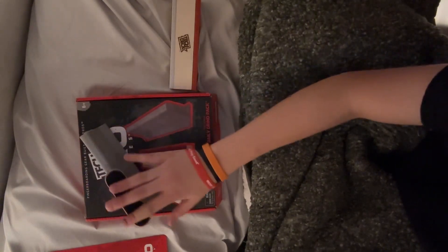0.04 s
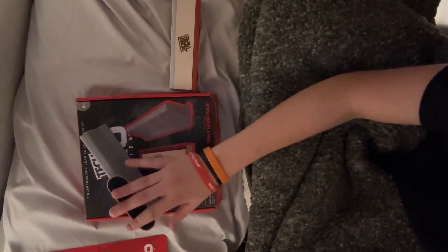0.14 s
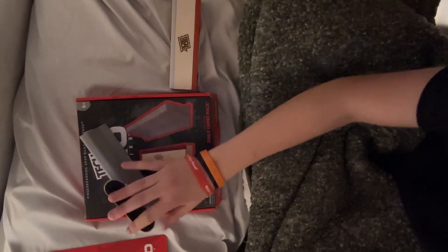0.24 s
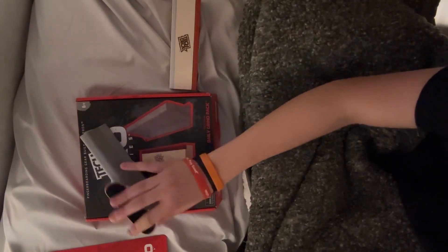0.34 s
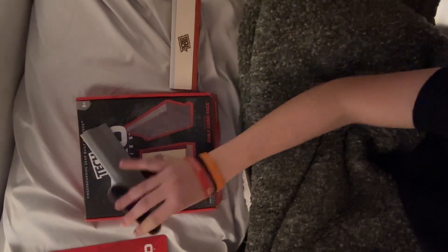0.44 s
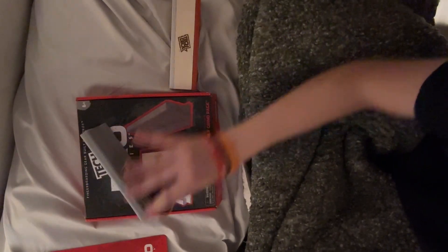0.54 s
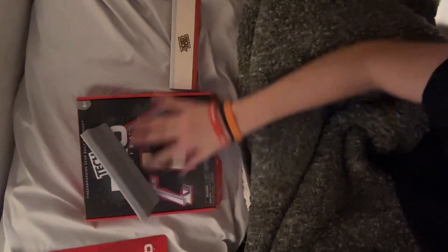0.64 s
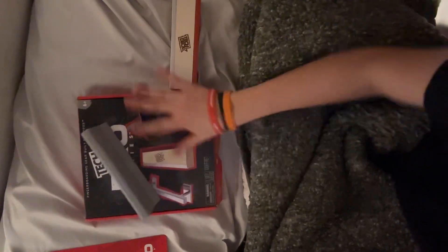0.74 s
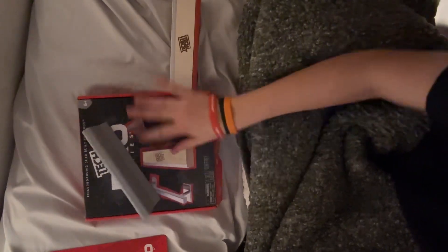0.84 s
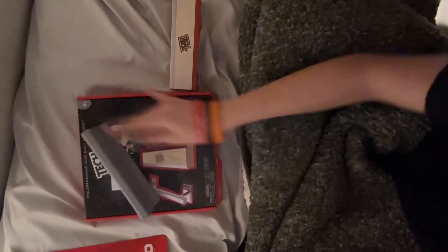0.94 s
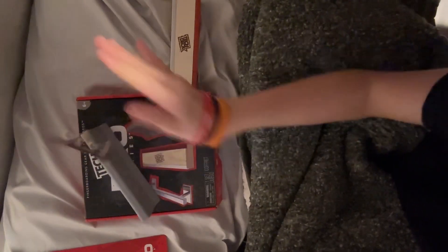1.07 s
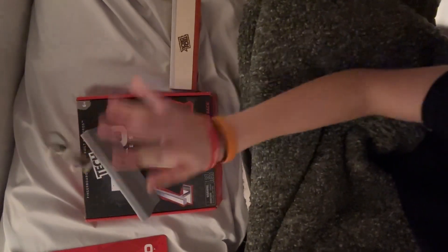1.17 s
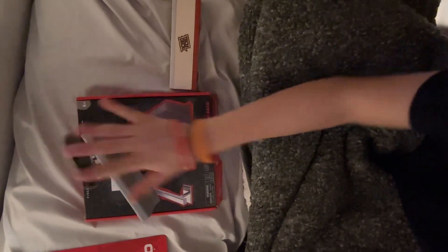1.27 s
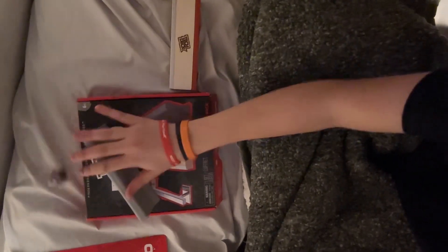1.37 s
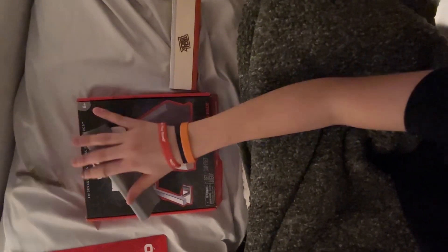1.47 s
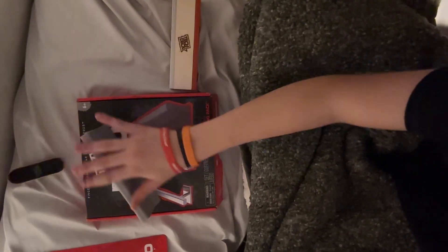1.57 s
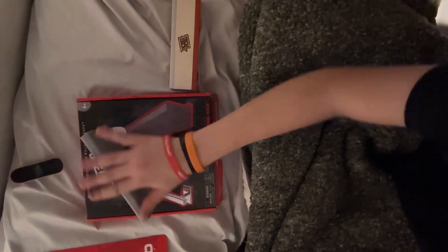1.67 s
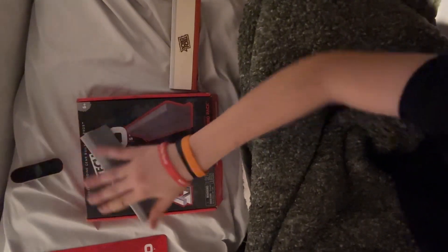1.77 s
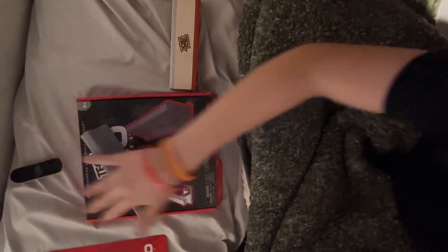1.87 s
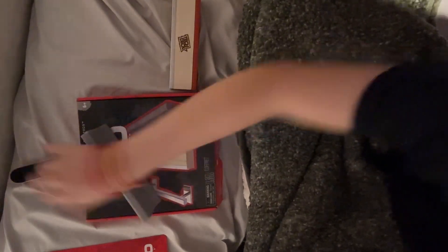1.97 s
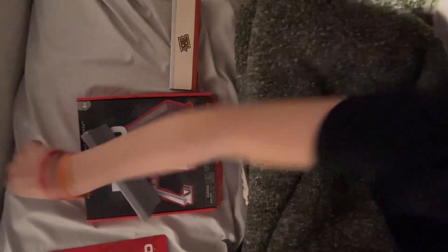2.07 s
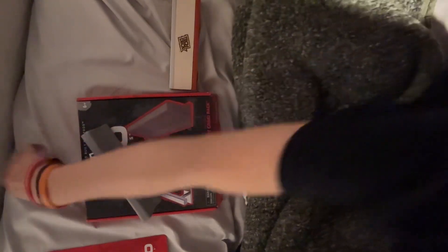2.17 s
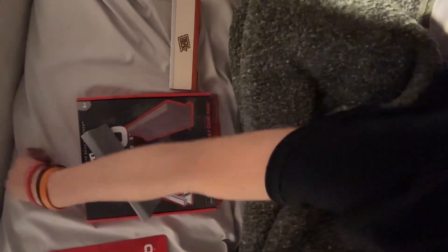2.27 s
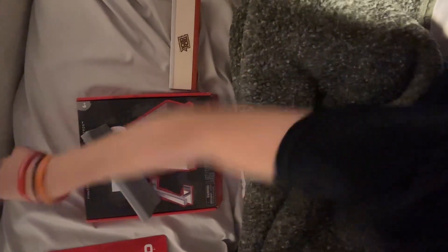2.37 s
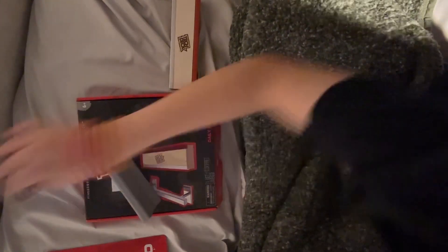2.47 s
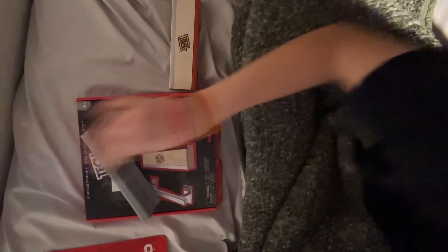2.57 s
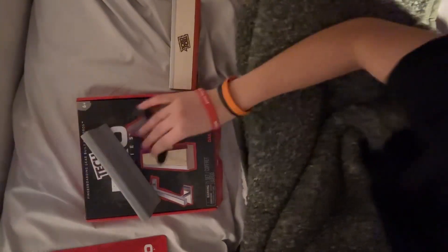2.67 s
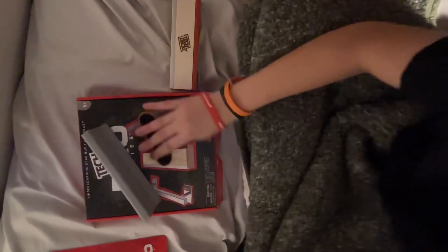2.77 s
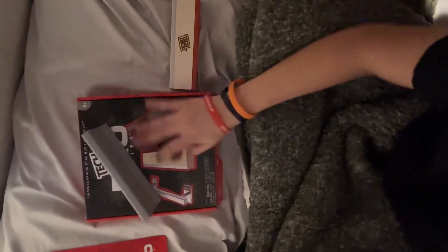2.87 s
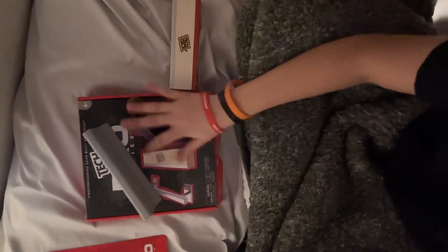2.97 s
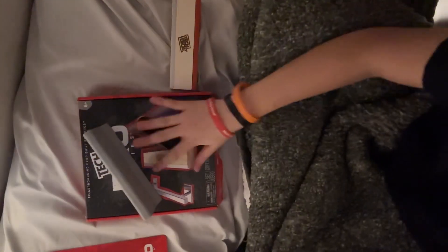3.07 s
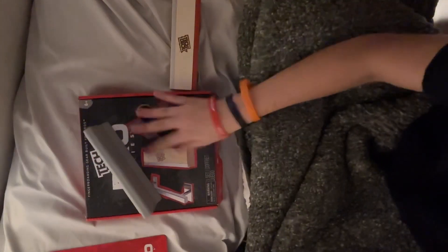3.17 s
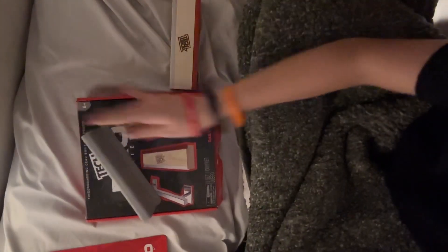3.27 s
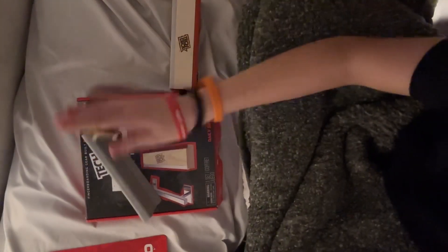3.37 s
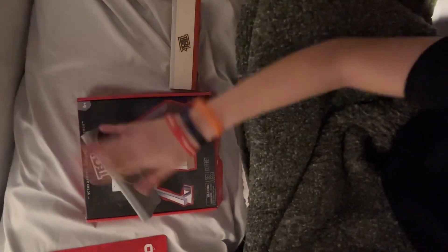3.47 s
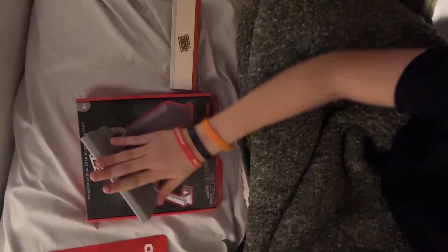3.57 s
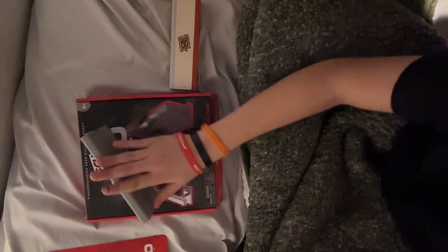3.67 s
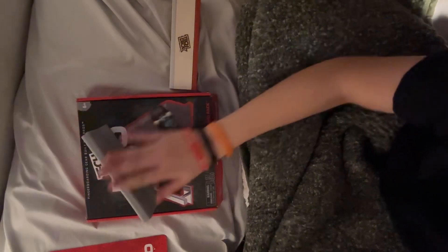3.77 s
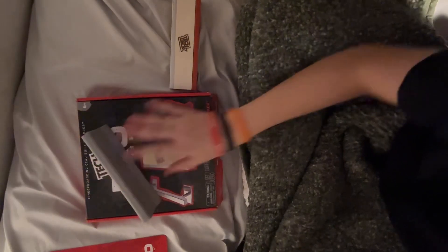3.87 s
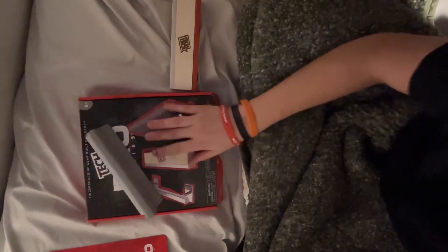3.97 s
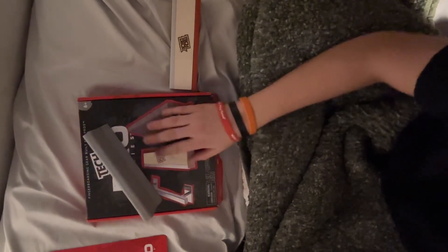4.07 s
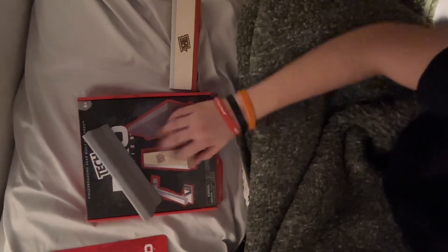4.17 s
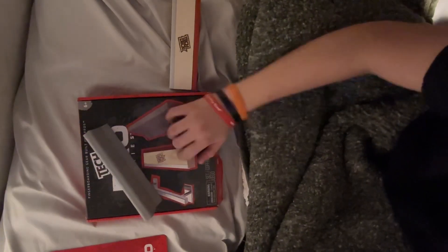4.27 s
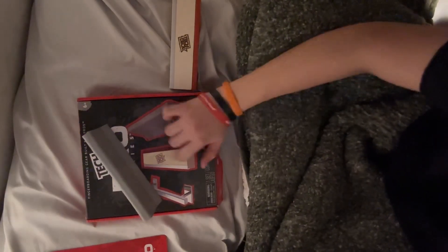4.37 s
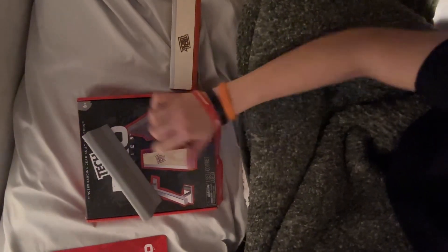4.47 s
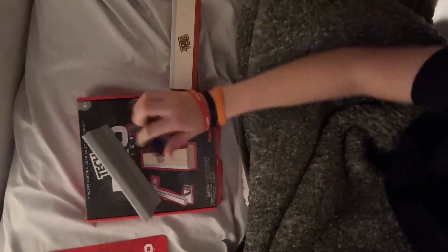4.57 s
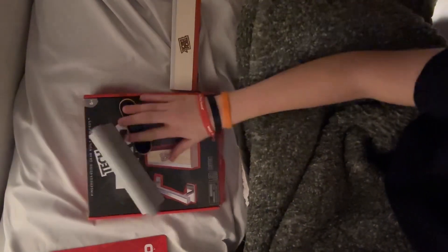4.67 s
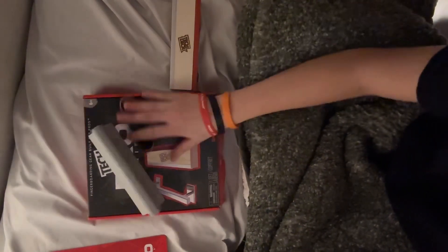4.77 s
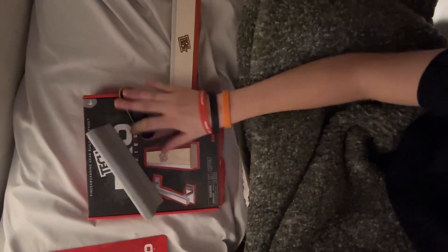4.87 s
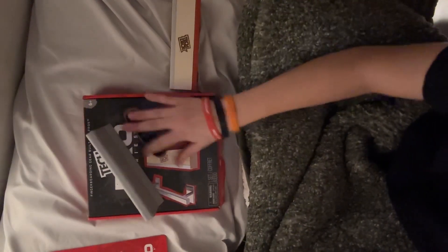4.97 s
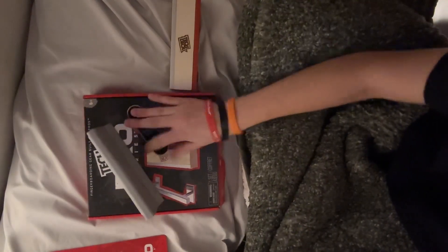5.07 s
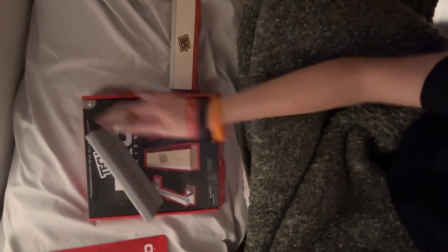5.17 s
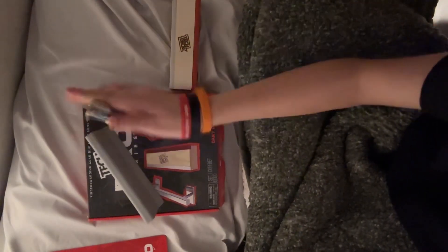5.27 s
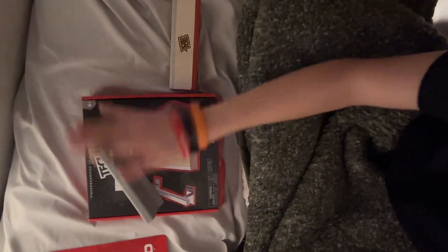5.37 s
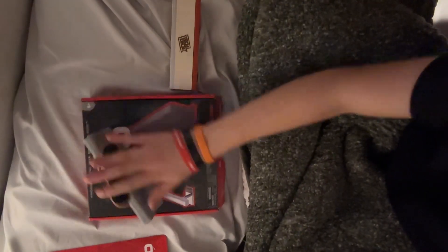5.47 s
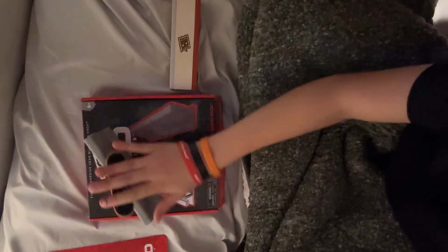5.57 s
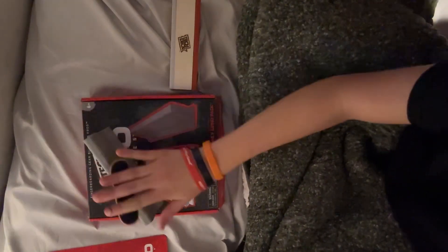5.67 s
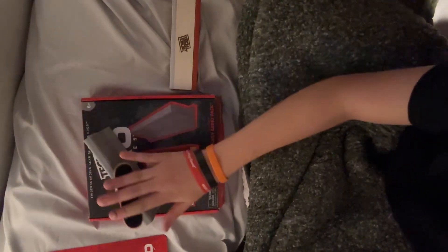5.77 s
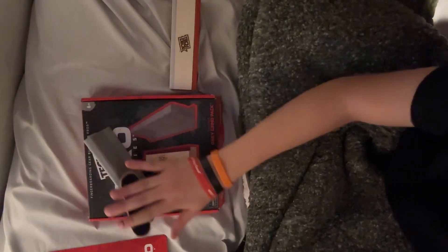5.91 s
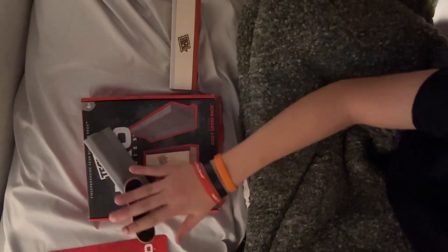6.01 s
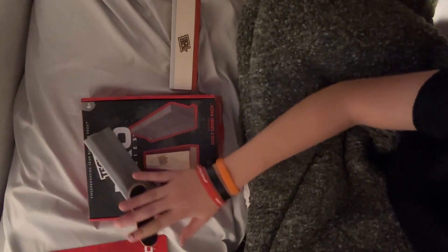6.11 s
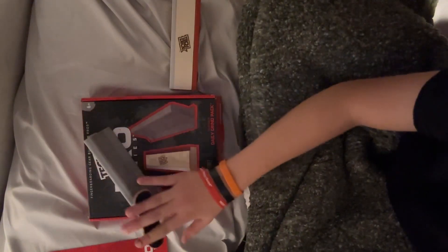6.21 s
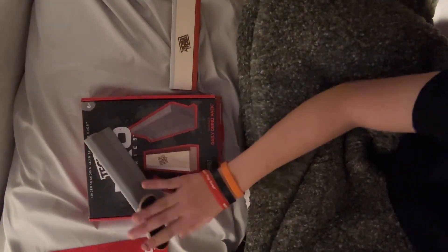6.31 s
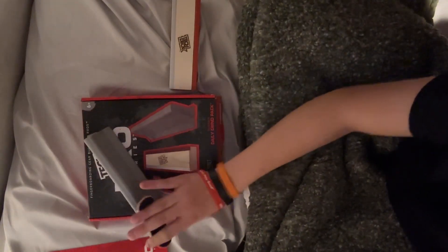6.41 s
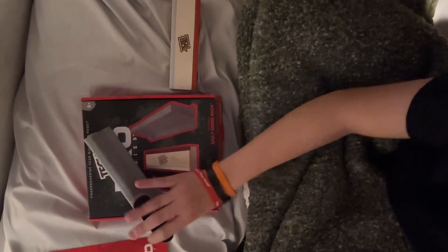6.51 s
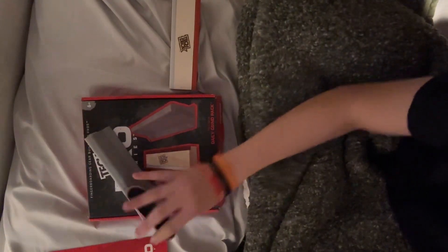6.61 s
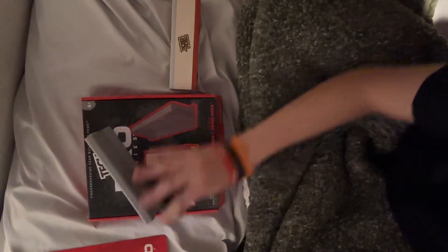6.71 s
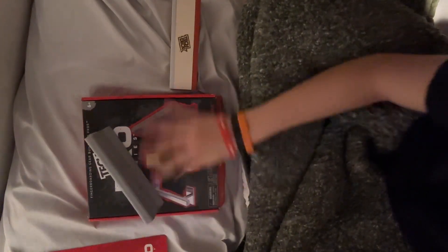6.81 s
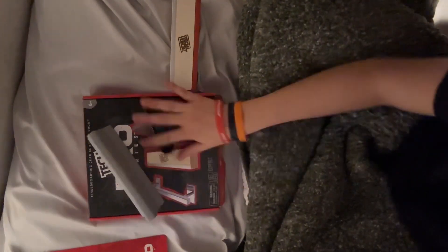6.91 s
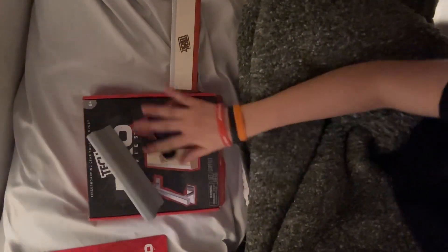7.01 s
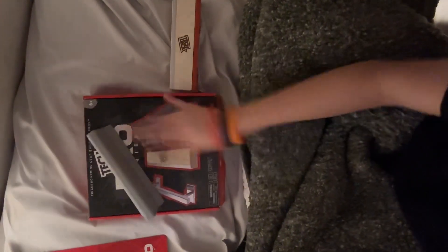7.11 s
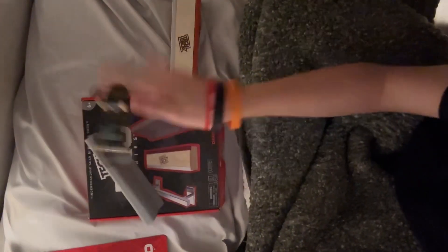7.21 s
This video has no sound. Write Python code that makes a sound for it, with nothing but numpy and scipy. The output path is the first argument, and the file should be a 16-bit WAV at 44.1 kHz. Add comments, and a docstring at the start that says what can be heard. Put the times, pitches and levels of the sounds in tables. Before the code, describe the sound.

Dry, crisp toy-board tricks heard up close through a small stereo microphone: a loud pop, rolling grit and another landing, then a quiet pause of faint handling. Clacks return, building into a rapid clatter and grind, followed by softer taps, a sharp triple knock and single hits. Gentle rubbing fills a later lull before a final loud pop and landing. The box beneath answers with short dull booms; hardly any room echo.

```python
"""Toy fingerboard on a boxed ledge

A toy fingerboard is slapped, rolled and ground on a plastic ledge on a cardboard box on a bed.
Each blow is a chatter of contacts ringing deck, ledge and axles; the hollow box booms as a sagging tone.
Wheels and fingers rub in between as noise through the same modes; the ledge pings and bearings whir.
Two microphone ports a finger apart hear it from one side, with near scatter, room and a faint floor."""
import sys
import numpy as np
from scipy import signal
from scipy.fft import rfft, irfft, next_fast_len
from scipy.io import wavfile
from scipy.ndimage import uniform_filter1d, map_coordinates

SR = 44100
rng = np.random.default_rng(int(sys.argv[2]) if len(sys.argv) > 2 else 0)


def how_loud(loudness_db):
    """Turn decibels into a plain amplitude multiplier (0 dB gives 1, 20 dB gives 10)."""
    steps = np.asarray(loudness_db, float) / 20
    return 10 ** steps


def inscribe(sig):
    """Save sig as 16-bit PCM at rate SR to the path in sys.argv[1].

    A 1-D sig is mono; a 2-D sig holds one channel per row.
    Samples are clipped to [-1, 1] before scaling.
    """
    pcm = np.round(np.clip(np.atleast_2d(sig).T, -1, 1) * 32767)
    wavfile.write(sys.argv[1], SR, pcm.astype(np.int16))


N = 319725

# Blows, before colouring: (time [s], deck peak [dB], hardness = ledge above deck [dB], chatter t60 [s])
BLOWS = [(0.052, -66, 30, 0.0064), (0.22, -55.5, 19.5, 0.026), (0.339, -22.5, -7, 0.039),
         (0.349, -34.5, 7.5, 0.12), (0.369, -32, -2, 0.033), (0.408, -39, 4.5, 0.063),
         (0.424, -31, 0, 0.029), (0.533, -68, 20.5, 0.083), (0.611, -3.5, -3.5, 0.034),
         (0.628, 1, -11, 0.044), (0.736, -25, 4, 0.002), (0.796, -22.5, -0.5, 0.01),
         (0.801, -23.5, 3, 0.017), (0.817, -27, -1.5, 0.019), (0.899, -5, -2.5, .015),
         (1.242, -6.5, -8.5, 0.088), (1.26, -25, 14, .015), (1.274, -25, 8.5, 0.015),
         (1.417, -69.5, 28.5, .018), (1.48, -57.5, 27.5, 0.005), (1.535, -79, 31, 0.017),
         (2.025, -53.5, -15, .012), (2.08, -62, -4, .023), (2.128, -63, -2, .015), (2.176, -46, 3, 0.012),
         (2.242, -42, -11.5, 0.018), (2.444, -72, 26.5, .015), (2.469, -64, 23, .019),
         (2.51, -75.5, 28.5, 0.0094), (2.567, -68.5, 26, 0.019), (2.682, -16.5, 2, 0.035),
         (2.708, -4.5, -7.5, 0.0093), (2.817, -7, -11.5, 0.018), (2.96, -27, 2, 0.012),
         (3.074, -24.5, -3.5, 0.0033), (3.165, -47.5, 9, 0.0081), (3.2, -7, -6.5, 0.017),
         (3.454, -28.5, 16, 0.017), (3.459, -30, 22, 0.026), (3.48, -38, 31, 0.067),
         (3.501, -47, 25, 0.065), (3.514, -18.5, 3.5, 0.014), (3.532, 2, -11.5, 0.015),
         (3.571, -3.5, -11, .019), (3.577, -3.5, -22, 0.021), (3.622, -3, -11.5, 0.031),
         (3.667, -9, -18, 0.0087), (3.683, -14.5, -15.5, 0.024), (3.703, -18.5, -6.5, 0.057),
         (3.729, -28, -2.5, 0.023), (3.9, -22.5, -3, 0.0125), (3.94, -27, -9.5, 0.067),
         (4.028, -29, -22, 0.0073), (4.129, -37, 2, 0.036), (4.196, -54, -4, 0.012),
         (4.219, -31.5, -16, 0.038), (4.262, -37, -2, 0.021), (4.301, -21, -15.5, 0.0093),
         (4.56, -41, 0, 0.0082), (4.612, -5.5, -4, 0.0071), (4.624, -2.5, -4.5, 0.0055),
         (4.639, -6.5, -7, 0.009), (4.815, -12.5, -7.5, 0.019), (5.079, -37, 3.5, 0.039),
         (5.111, -2.5, -11, .015), (5.272, -67, 22.5, .012), (5.295, -72.5, 35, 0.017),
         (5.381, -19.5, 11, 0.026), (5.404, -25.5, 17, 0.03), (5.423, -29.5, 2.5, 0.09),
         (6.063, -21.5, 1, 0.037), (6.13, -19, 8, 0.026), (6.7892, -9, -2.5, 0.015),
         (6.809, -4, -6.5, 0.039), (6.823, 2.5, -17.5, 0.024), (7.077, -3, -10.5, 0.014)]
# Box answering a blow or a press of the hand:
# (time [s], tone level [dB], final pitch [Hz], time to fall 48 dB before limiting [s])
BOX_BOOMS = [(0.329, -39, 133, 0.3), (0.614, -2, 218, 0.017), (0.632, -9, 162.6, 0.051),
             (0.747, -27, 121, 0.025), (0.806, -19.5, 116, 0.014), (0.898, -14.5, 118.5, 0.045),
             (0.989, -53, 149, 0.13), (1.249, -13.5, 129, 0.037), (1.279, -21, 152.6, 0.27),
             (1.306, -15, 94, 0.085), (1.476, -39, 77, 0.15), (2.027, -46, 251, 0.21),
             (2.08, -41.5, 177, 0.033), (2.131, -46, 190, 0.065), (2.178, -39.5, 180, 0.057),
             (2.246, -37, 86.6, 0.1), (2.323, -49, 170, 0.065), (2.684, -15, 178, 0.043),
             (2.71, -13, 120, 0.027), (2.818, -22, 184, 0.062), (2.961, -30.5, 210, 0.021),
             (3.203, -25, 133, 0.052), (3.268, -41.5, 114.2, 0.065), (3.459, -32, 136, 0.26),
             (3.479, -23, 99, 0.19), (3.53, -11.5, 142, 0.062), (3.567, -10, 155.4, 0.064),
             (3.621, -14.5, 280, 0.1), (3.667, -20, 290, 0.17), (3.704, -20.5, 299.5, 0.092),
             (3.901, -17.5, 123.5, 0.065), (3.943, -17.5, 91.3, 0.058), (4.034, -23.5, 109, 0.075),
             (4.133, -33, 159, 0.035), (4.199, -28, 118, 0.068), (4.264, -31.5, 160, 0.031),
             (4.315, -27.5, 117, 0.064), (4.615, -14.5, 201, 0.14), (4.642, -10.5, 110.5, 0.051),
             (4.803, -17.5, 98.7, 0.091), (4.85, -27.5, 142, 0.024), (5.117, -17, 138, 0.048),
             (5.386, -25, 131, 0.25), (5.412, -18.5, 101, 0.1), (5.674, -42.5, 154, .1),
             (5.902, -41.5, 126, .1), (6.066, -32, 146, 0.32), (6.133, -25, 135, 0.13),
             (6.7926, -1, 184, 0.016), (6.811, -12, 110.5, 0.098), (6.824, -7.5, 103, 0.053),
             (7.083, -13.5, 108, 0.045), (7.108, -22, 110, 0.056), (7.181, -39, 136, 0.067)]
# Modes of deck, ledge and axles, nominal: (centre [Hz], relative level [dB], t60 [s])
BODY_MODES = [(470, -4, .015), (615, 0, .015), (830, -2, .012), (1120, -4, .012), (1250, -6, .012),
              (1540, -4, .012), (1750, -8, .012), (2000, -8, .01), (2400, -8, .01), (2700, -2, .008),
              (3050, 0, .01), (3530, -4, .01), (3850, -4, .008), (4300, -4, .01), (4880, -7, .007),
              (5500, -5, .01), (6200, -7, .005), (7200, -6, .006), (8100, -6, .005), (9400, -6, .005),
              (10600, -2, .007), (12000, 0, .007), (13200, -2, .005), (14600, -3, .004), (15700, -6, .004)]
# Borders deck/ledge and ledge/axles: (border [Hz], border [Hz])
PART_BORDERS_HZ = (2200, 8500)
# Strokes of wheels and fingers:
# (start [s], end [s], deck level [dB], hardness = ledge above deck [dB], box shaking before smoothing [dB])
RUB_STROKES = [(0.0, 0.099, -55.5, 0, -52), (0.176, 0.227, -65, -4.5, -64), (0.32, 0.4, -49, -5.5, -54),
               (0.466, 0.51, -81.5, 6.5, -63.5), (0.638, 0.748, -33, -16.5, -39.5),
               (0.81, 0.89, -36.5, -8.5, -46), (0.93, 1.014, -78, 10, -57.5),
               (1.37, 1.432, -70.5, 5.5, -62.5), (1.47, 1.6, -79.5, 15.5, -57.5),
               (1.6, 1.82, -93, 16.5, -71.5), (1.92, 2.16, -73.5, -4.5, -64), (2.17, 2.346, -72, 7, -53.5),
               (2.44, 2.6, -86, 15.5, -80.5), (2.62, 2.67, -77, 7.5, -73),
               (2.706, 2.789, -36.5, -23, -48.5), (2.794, 2.816, -37, -13, -53),
               (2.866, 2.918, -33, -12, -39.5), (2.98, 3.038, -37.5, -17.5, -45),
               (3.08, 3.205, -44.5, -9, -49), (3.313, 3.336, -74.5, 15, -57),
               (3.387, 3.452, -80, 12.5, -72.5), (3.64, 3.744, -39.5, -18, -33.5),
               (3.74, 3.92, -46, -13, -57.5), (4.002, 4.016, -55.5, -14.5, -49.5),
               (4.062, 4.165, -50.5, -4.5, -51.5), (4.197, 4.311, -50, -0.5, -47),
               (4.481, 4.62, -67.5, 2, -70.5), (4.652, 4.715, -48.5, -13, -51),
               (4.77, 4.836, -37.5, -15.5, -49), (4.814, 4.955, -32.5, -20.5, -42.5),
               (5.006, 5.05, -48.5, -13.5, -55.5), (5.105, 5.117, -43, -3, -34.5),
               (5.17, 5.367, -92.5, 25, -78.5), (5.42, 5.446, -50.5, 5.5, -38.5),
               (5.5, 5.653, -49.5, -5, -55), (5.68, 5.799, -61.5, -3.5, -58.5),
               (5.817, 5.936, -54.5, -2.5, -57), (5.958, 6.06, -66, -5, -53),
               (6.08, 6.119, -54.5, -2.5, -51.5), (6.15, 6.282, -60.5, -0.5, -51.5),
               (6.403, 6.516, -73.5, 6, -61.5), (6.534, 6.631, -72.5, 11.5, -67),
               (6.68, 6.77, -71, -5, -76), (6.844, 6.909, -40, -14, -44.5), (6.963, 7.04, -38, -16.5, -51),
               (7.1, 7.139, -60, 9.5, -49.5), (7.175, 7.247, -72.5, 3, -64.5)]
# Box under rolling wheels: (centre [Hz], width of each of two passes [Hz], relative level [dB])
BOX_RUMBLE = [(81, 19, -1), (138.9, 190, 5.5), (270, 130, -13.5)]
# Ledge let go, ringing freely: (time [s], level at onset before the attack ramp [dB])
LEDGE_PINGS = [(0.4269, -38.5), (1.2614, -26), (1.2753, -28), (1.3938, -59.5), (3.458, -34.5),
               (5.3864, -31)]
# Wheels spinning free after the board flies off: (time [s], level [dB])
FREE_SPIN = [(1.491, -70), (1.62, -84), (1.78, -94), (1.86, -99)]
# Bearing resonances: (centre [Hz], width [Hz], relative level [dB])
BEARING_BANDS = [(3050, 200, -5.5), (3850, 180, -0.5), (5400, 220, 3)]
# Colour of the housing at the ports: (frequency [Hz], gain [dB])
HOUSING_COLOUR = [(250, 4), (450, -12.5), (630, -3.5), (1000, 2.5), (1700, 0), (2400, -4.5), (3200, 3),
                  (4300, 3), (5400, 8), (6400, 13), (7600, 5.5), (8800, 2), (10500, 1.5), (13000, 0.5),
                  (16000, -4)]
# Phase by which the left port leads: (frequency [Hz], lead [rad])
LEFT_LEAD = [(60, .3), (260, .5), (520, -.5), (1290, .5), (1800, .1), (2500, 1.1), (3600, 1.1), (5100, 2.3),
             (8300, 3.4), (10000, 5.0), (11900, 5.9), (16400, 6.3)]
# Room decay: (frequency [Hz], t60 [s])
ROOM_DECAY = [(100, 0.8), (500, 0.059), (2000, 0.05), (8000, 0.14), (16000, 0.027)]
# Shape of room and preamp noise: (frequency [Hz], relative density [dB per Hz])
FLOOR_SHAPE = [(15, -29), (25, -1.5), (134, -3.5), (236, -34.5), (384, -26.5), (575, -34.5), (796, -32.5),
               (863, -47), (7510, -48.5), (16000, -60.5)]

RING_SHARE = 0.8  # of the nominal t60, left under the fingers at a blow
BLOW_AXLE_DB, BLOW_AXLE_SLOPE = -4.5, 1.15  # axles above deck = this + slope x hardness
RUB_AXLE_DB, RUB_AXLE_SLOPE = -5.5, 1.3  # likewise for strokes
RISE_DB_PER_S, FALL_DB_PER_S = 700, 504  # before the start and after the end of a stroke
SWELL_DB = 1.5  # middle of a stroke above its ends
SHAKE_S = 0.034  # the box follows the hand sluggishly
GRAZE_DB, GRAZE_DB_PER_S = -24.5, 2498  # re blow; rise towards it
RATTLE_DB, RATTLE_T60_S = -32.5, 0.17  # re blow; loose parts after it
PING_HZ, PING_T60_S = 1692, 0.085
ROLL_DB, ROLL_DRIFT_DB = -17, 6  # bearings re ledge strokes; drift of each band
NEAR_DB, NEAR_T60_S = -9, 0.028
ROOM_DB, FLOOR_DB = -25.5, -67
BAND_LIMIT_HZ = 15900


def clacks():
    """A burst of tiny contacts rings every mode; each blow excites the modes in different shares."""
    out = np.zeros(N)
    t = np.arange(4096) / SR
    hz, db, t60_s = np.transpose(BODY_MODES)
    part = np.searchsorted(PART_BORDERS_HZ, hz)
    spots = rng.standard_normal((len(BLOWS), 2, len(BODY_MODES)))
    contacts = rng.standard_normal((len(BLOWS), 3, len(t))) ** 3  # cubed: sparse peaks
    first_touch = 1 + 2.5 * np.exp(-t / 0.0008)  # the hardest
    attack = np.minimum(t / 0.0004, 1)
    for (s, deck_db, hardness_db, chatter_s), (louder, higher), forces in zip(BLOWS, spots, contacts):
        pitch_hz = hz * (1 + 0.045 * higher)
        decay_db = -60 * t[:, None] / (RING_SHARE * t60_s)
        modes = how_loud(db + 4.5 * louder + decay_db) * np.sin(2 * np.pi * pitch_hz * t[:, None])
        chatter = first_touch * how_loud(-60 * t / chatter_s) * attack
        for k, level_db in enumerate(blow_parts_db(deck_db, hardness_db)):
            response = modes[:, part == k].sum(1)
            struck = signal.fftconvolve(forces[k] * chatter, response)[:len(t)]
            sound = own_band(struck, k)
            add(out, s, how_loud(level_db) * sound / abs(sound).max())
    return out


def booms():
    """The lid swells, tight and high at first, then sags to its own pitch; loose cardboard thuds roughly."""
    out = np.zeros(N)
    t = np.arange(SR // 3) / SR
    flap_noise = rng.standard_normal((len(BOX_BOOMS), len(t)))
    flaps = signal.sosfilt(signal.butter(2, (110, 600), "band", fs=SR, output="sos"), flap_noise)
    for (s, db, hz, fall_s), flap in zip(BOX_BOOMS, flaps):
        turns = np.cumsum(hz * (1 + 0.5 * np.exp(-t / 0.0021))) / SR
        life_s = np.clip(fall_s, 0.02, 16 / hz)  # soft cardboard: at most 16 cycles
        decay = how_loud(-30 * (t / life_s) - 18 * (t / life_s) ** 2)
        envelope = (1 - np.exp(-t * hz / 0.4)) * decay
        thud = 0.4 * evened(flap) * how_loud(-60 * t / 0.06)
        lid = np.sin(2 * np.pi * turns) + thud
        add(out, s, -how_loud(db) * lid * envelope / envelope.max())
    return out


def rubbing(strength):
    """Dense grit under wheels and fingers feeds the same modes, whose shares drift as the contact moves."""
    uneven = how_loud(3.0 * wander(0.005, count=1)[0])
    uneven = uneven * how_loud(1.5 * wander(0.025, count=1)[0])
    grit = uneven * rng.standard_normal((3, N)) * how_loud(3.0 * rng.exponential(1, N))
    parts = np.zeros((3, N))
    for (hz, db, t60_s), drift in zip(BODY_MODES, wander(0.12, count=len(BODY_MODES))):
        k = np.searchsorted(PART_BORDERS_HZ, hz)
        width_hz = (1 + k) * 2.2 / t60_s  # fingers damp the upper parts more
        parts[k] += how_loud(db + 4.5 * drift) * evened(ring(grit[k], hz, width_hz))
    shake = rng.standard_normal(N)
    box = sum(how_loud(db) * ring(ring(shake, hz, width_hz), hz, width_hz) for hz, width_hz, db in BOX_RUMBLE)
    box = strength[3] * evened(box)
    return box + sum(strength[k] * evened(own_band(parts[k], k)) for k in range(3))


def contact():
    """Strength in deck, ledge, axles, box: strokes rise, swell, fall; blows add graze and rattle."""
    t = np.arange(0, N + 64, 64) / SR
    power = np.zeros((4, len(t)))
    for start, end, deck_db, hardness_db, box_db in RUB_STROKES:
        edge_db = -RISE_DB_PER_S * np.maximum(start - t, 0) - FALL_DB_PER_S * np.maximum(t - end, 0)
        progress = np.clip((t - start) / (end - start), 0, 1)
        edge_db = edge_db + SWELL_DB * (np.sin(np.pi * progress) - 1)
        axle_db = deck_db + RUB_AXLE_DB + RUB_AXLE_SLOPE * hardness_db
        levels_db = np.array([deck_db, deck_db + hardness_db, axle_db, box_db])
        power += how_loud(2 * (levels_db[:, None] + edge_db))
    power[3] = abs(uniform_filter1d(power[3], round(SHAKE_S / t[1])))
    for s, deck_db, hardness_db, _ in BLOWS:
        away_s = abs(t - s)
        rattle_db = RATTLE_DB - 60 * away_s / RATTLE_T60_S
        graze_db = GRAZE_DB - GRAZE_DB_PER_S * away_s
        around_db = np.where(t > s, rattle_db, graze_db)
        power[:3] += how_loud(2 * (blow_parts_db(deck_db, hardness_db)[:, None] + around_db))
    return [np.interp(np.arange(N) / SR, t, np.sqrt(row)) for row in power]


def pings():
    """One lightly damped mode of the ledge."""
    out = np.zeros(N)
    t = np.arange(SR // 4) / SR
    tone = np.minimum(t / 0.0017, 1) * np.sin(2 * np.pi * PING_HZ * t)
    for s, db in LEDGE_PINGS:
        add(out, s, how_loud(db - 60 * t / PING_T60_S) * tone)
    return out


def spin(rolling):
    """Bearing noise through a few narrow resonances, from free wheels and from rolling ones."""
    noise = rng.standard_normal(N)
    free = how_loud(np.interp(np.arange(N) / SR, *np.transpose(FREE_SPIN), left=-120, right=-120))
    out = np.zeros(N)
    for (hz, width_hz, db), drift in zip(BEARING_BANDS, wander(0.2, count=len(BEARING_BANDS))):
        strength = free + how_loud(ROLL_DB + ROLL_DRIFT_DB * drift) * rolling
        out += how_loud(db) * evened(ring(noise, hz, width_hz)) * strength
    return out


def coloured(x):
    """The housing in front of the ports lifts some bands and shades others."""
    size = next_fast_len(N + 2048)
    gain = how_loud(read(HOUSING_COLOUR, np.fft.rfftfreq(size, 1 / SR)))
    return irfft(rfft(x, size) * gain, size)[:N]


def ports(x):
    """The left port is nearer: each side takes half the phase lead; a slow random shift is the toy moving."""
    size = next_fast_len(N + 2048)
    half_lead = np.exp(0.5j * read(LEFT_LEAD, np.fft.rfftfreq(size, 1 / SR)))
    pair = irfft(rfft(x, size) * np.array([half_lead, 1 / half_lead]), size)[:, :N]
    left, right = pair * how_loud([[0.3], [-0.3]])
    shift = 0.13 * wander(0.25, count=1)[0]  # samples
    return np.array([map_coordinates(side, [np.arange(N) + sign * shift], order=5)
                     for side, sign in ((left, 1), (right, -1))])


def near(x):
    """Dense short scatter from hand, box and bedding, different at each port."""
    t = np.arange(2048) / SR
    tail = rng.standard_normal((2, len(t))) * how_loud(-60 * t / NEAR_T60_S) * (t > 0.0004)
    tail = signal.sosfilt(signal.butter(1, (900, 8000), "band", fs=SR, output="sos"), tail)
    return signal.fftconvolve(x[None], tail / np.linalg.norm(tail[0]), axes=1)[:, :N]


def room(x):
    """Sparse taps of random sign, each band dying at its own speed among bedding and walls."""
    taps = np.zeros((2, SR // 2))
    slots = np.arange(200, SR // 2 - 20, 20)
    at = slots + rng.integers(0, 20, (2, len(slots)))
    np.put_along_axis(taps, at, rng.choice([-1., 1.], at.shape), 1)
    hz, t, bands = signal.stft(taps, SR, nperseg=256)
    decay = how_loud(-60 * t / read(ROOM_DECAY, hz)[:, None])
    tail = signal.istft(bands * decay, SR, nperseg=256)[1]
    # the mattress swallows the bass
    x = signal.sosfilt(signal.butter(1, 180, "high", fs=SR, output="sos"), x)
    return signal.fftconvolve(x[None], tail / np.linalg.norm(tail[0]), axes=1)[:, :N]


def floor():
    """Faint steady noise of room and preamp, alike in both ports only in the bass."""
    hz = np.fft.rfftfreq(N, 1 / SR)
    left, other = rfft(rng.standard_normal((2, N)))
    same = np.clip(2.3 / (1 + (hz / 200) ** 2), 0, 1)
    pair = np.array([left, same * left + np.sqrt(1 - same ** 2) * other])
    return how_loud(FLOOR_DB) * evened(irfft(pair * how_loud(read(FLOOR_SHAPE, hz)), N))


def blow_parts_db(deck_db, hardness_db):
    """Peak levels of deck, ledge and axles: harder blows favour the upper parts."""
    axle_db = deck_db + BLOW_AXLE_DB + BLOW_AXLE_SLOPE * hardness_db
    return np.array([deck_db, deck_db + hardness_db, axle_db])


def own_band(x, part):
    """Deck, ledge and axles radiate little outside their own ranges."""
    band_hz = ((340, 2800), (2300, 8500), (8000, 18000))[part]
    return signal.sosfilt(signal.butter(2, band_hz, "band", fs=SR, output="sos"), x)


def ring(force, hz, width_hz):
    """One damped resonance with gain near 1 at its centre."""
    r = np.exp(-np.pi * width_hz / SR)
    pole = r * np.exp(2j * np.pi * hz / SR)
    return 2 * (1 - r) * signal.lfilter([1], [1, -pole], force).imag


def wander(seconds, count):
    """Slow random curves of rms about 1: noise averaged over the given time."""
    noise = rng.standard_normal((count, N // 64 + 2))
    steps = uniform_filter1d(noise, round(seconds * SR / 64), axis=1)
    return [np.interp(np.arange(N) / 64, np.arange(len(row)), evened(row)) for row in steps]


def evened(x):
    """Scales to rms 1."""
    return x / np.sqrt(np.mean(x ** 2) + 1e-20)


def read(points, hz):
    """Reads a spectrum table on a log-frequency axis."""
    f, value = np.transpose(points)
    return np.interp(np.log(hz + 1), np.log(f + 1), value)


def add(mix, s, sound):
    """Mixes a sound in at s seconds."""
    part = mix[round(s * SR):][:len(sound)]
    part += sound[:len(part)]


def scene():
    """Toy and box at the two ports, with scatter, room and floor."""
    strength = contact()
    board = clacks() + rubbing(strength) + pings() + spin(strength[1])
    toy = coloured(board) + booms()
    return ports(toy) + how_loud(NEAR_DB) * near(toy) + how_loud(ROOM_DB) * room(toy) + floor()


def band_limit(x):
    """A steep low-pass at the top of the band."""
    return signal.sosfilt(signal.butter(12, 16820, fs=SR, output="sos"), x)


def record(dry):
    """Bass cut, soft overload, band limit."""
    cut = signal.sosfilt(signal.butter(2, 40, "high", fs=SR, output="sos"), dry)
    soft = 1.1 * np.tanh(cut / 1.05)
    lowpass = signal.firwin(101, BAND_LIMIT_HZ, window=("kaiser", 6), fs=SR)
    mix = signal.oaconvolve(soft, lowpass[None], "same")
    return band_limit(mix)


dry = scene()
out = record(dry)
inscribe(out)
```